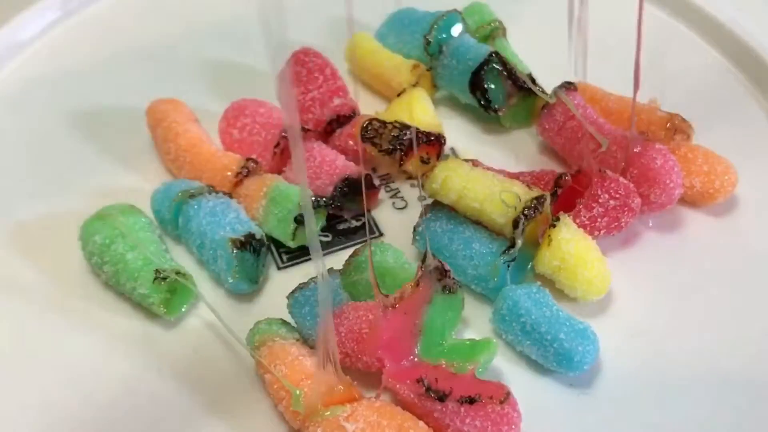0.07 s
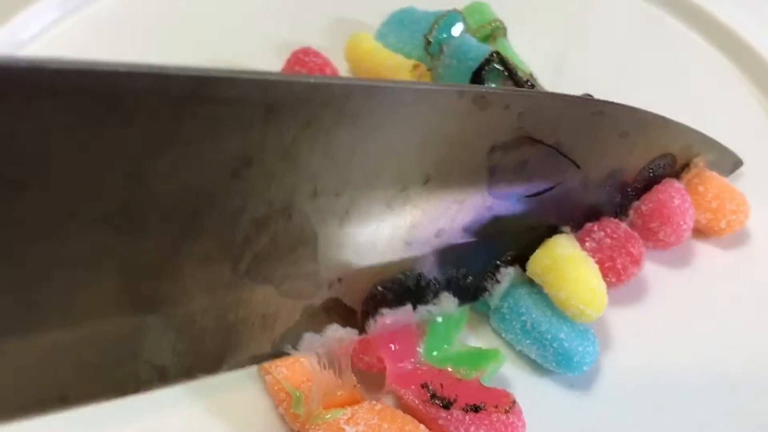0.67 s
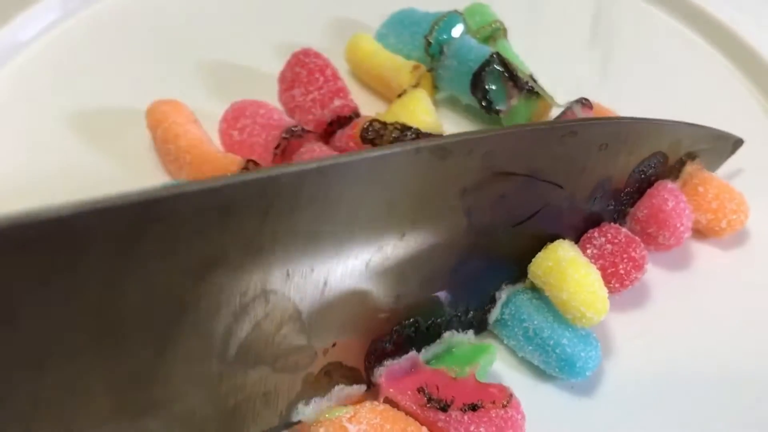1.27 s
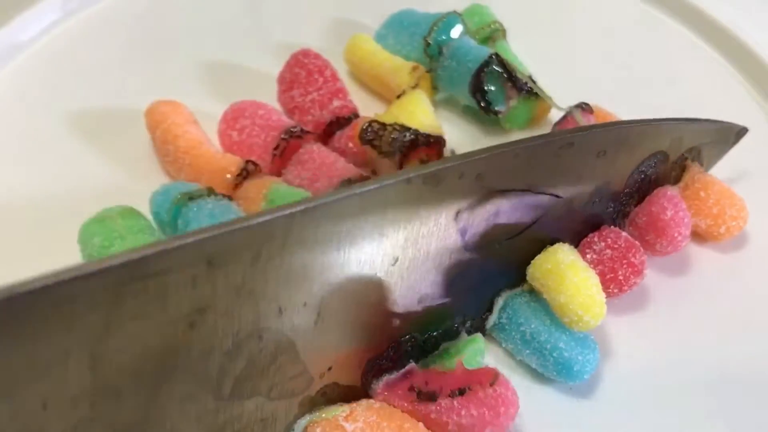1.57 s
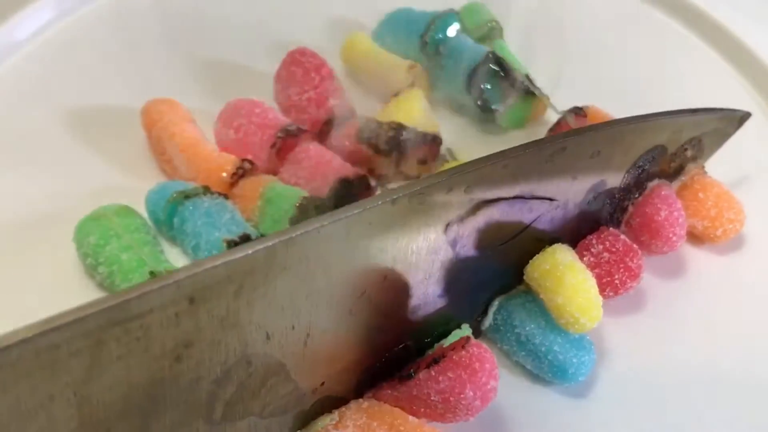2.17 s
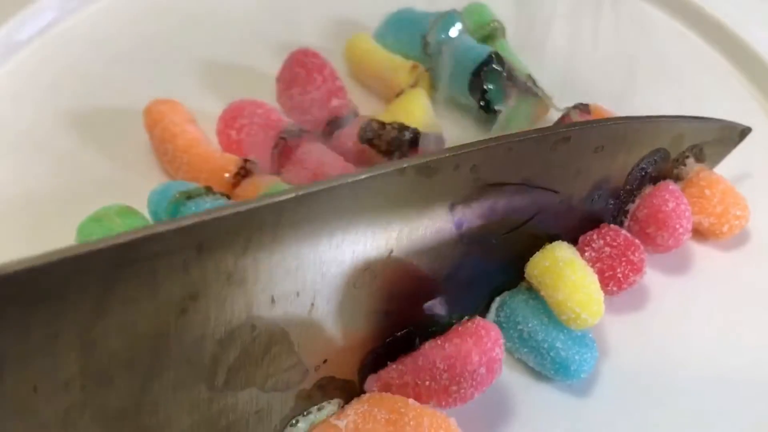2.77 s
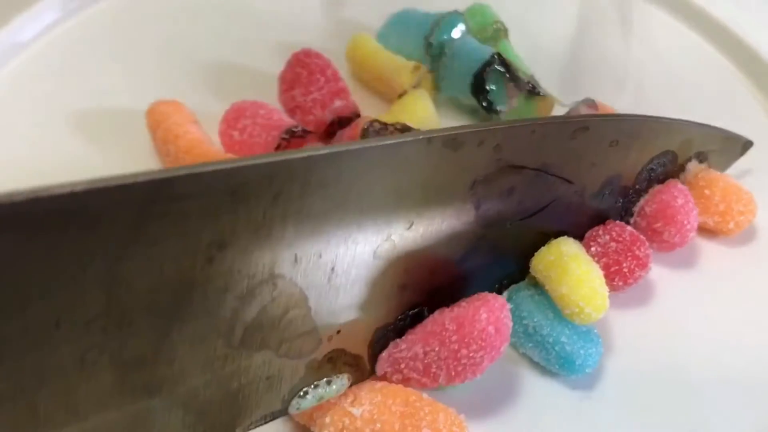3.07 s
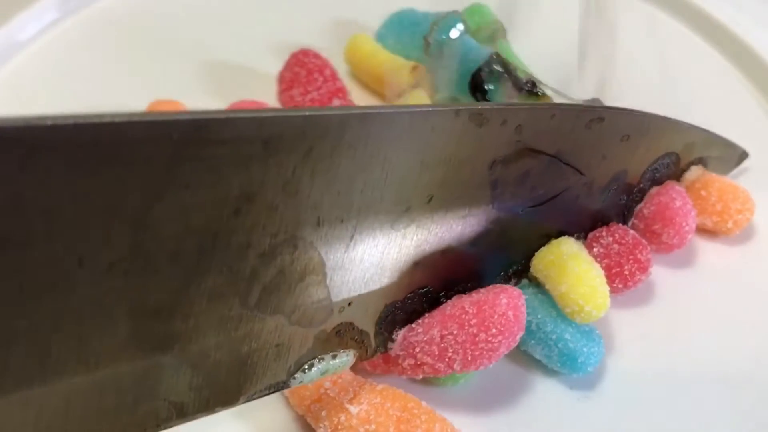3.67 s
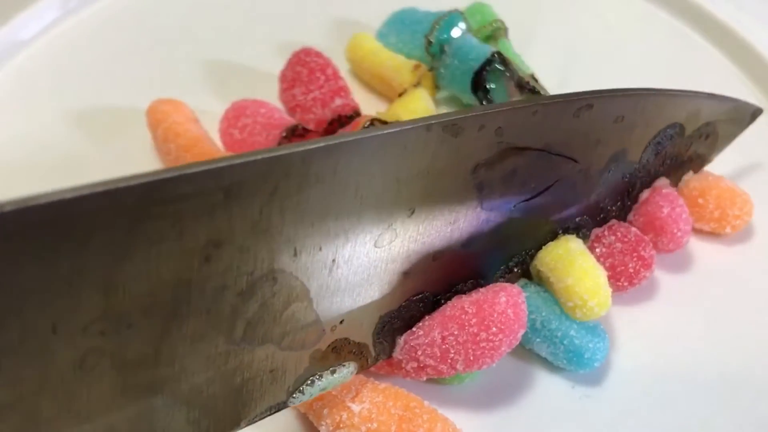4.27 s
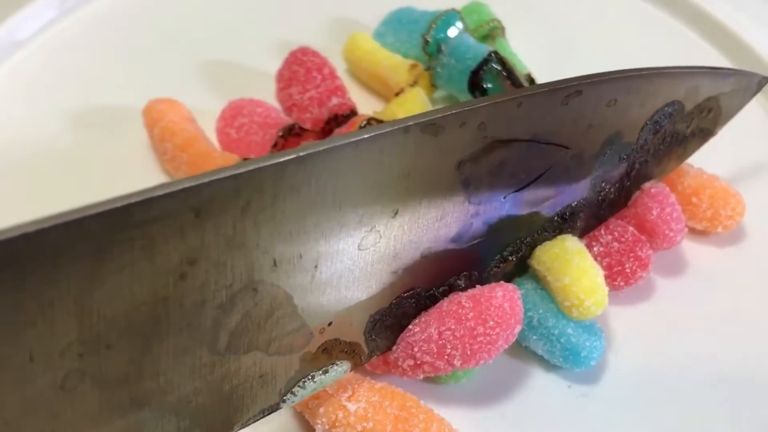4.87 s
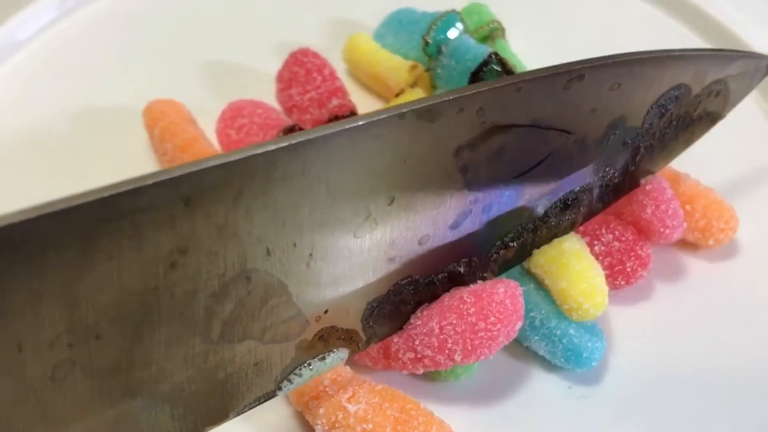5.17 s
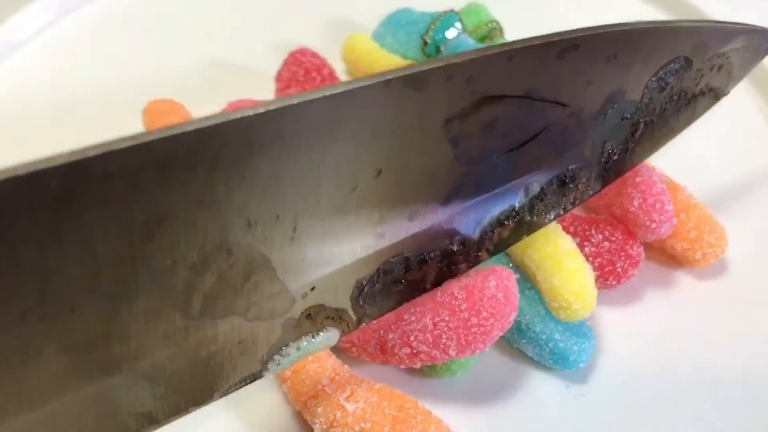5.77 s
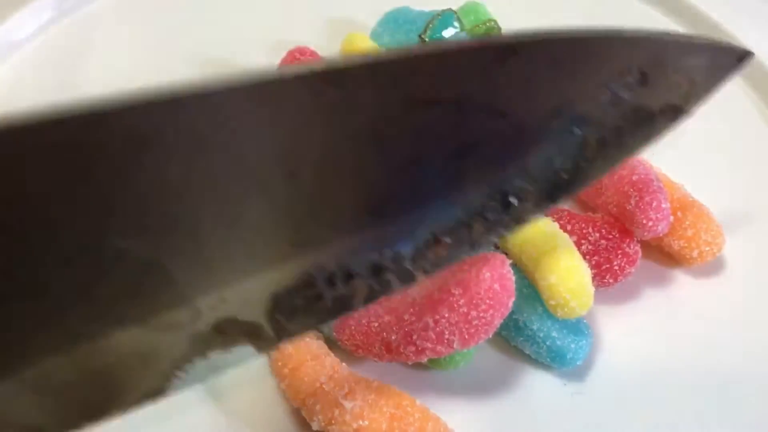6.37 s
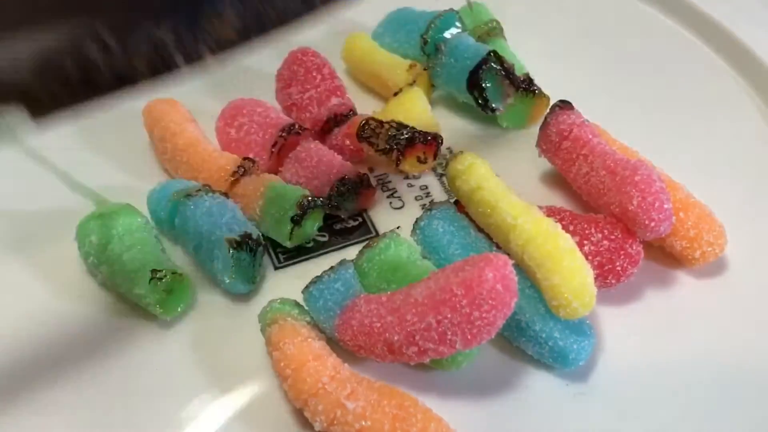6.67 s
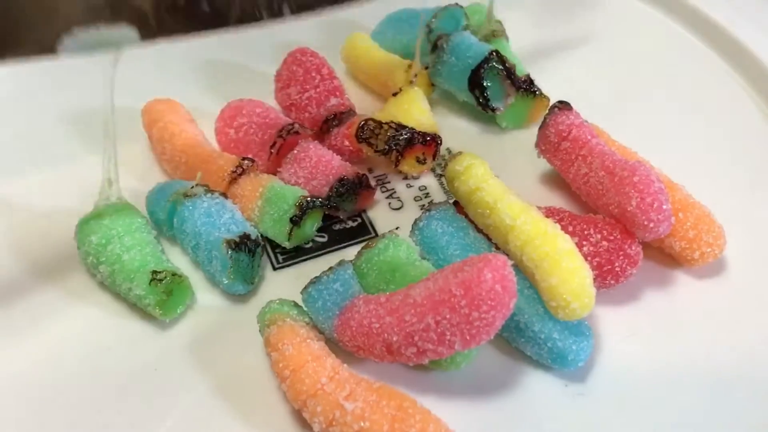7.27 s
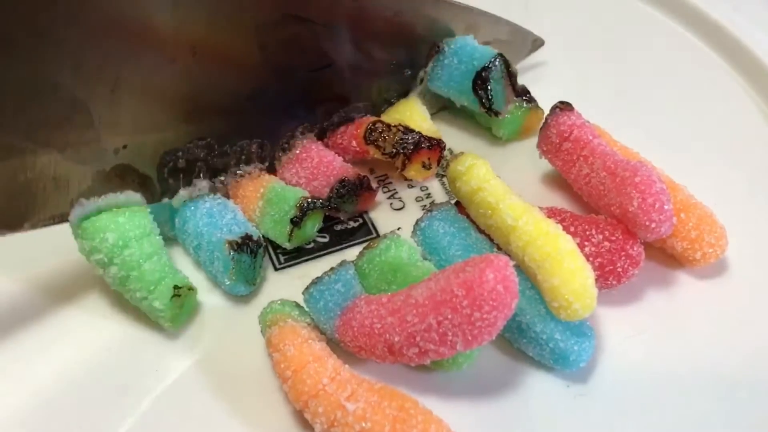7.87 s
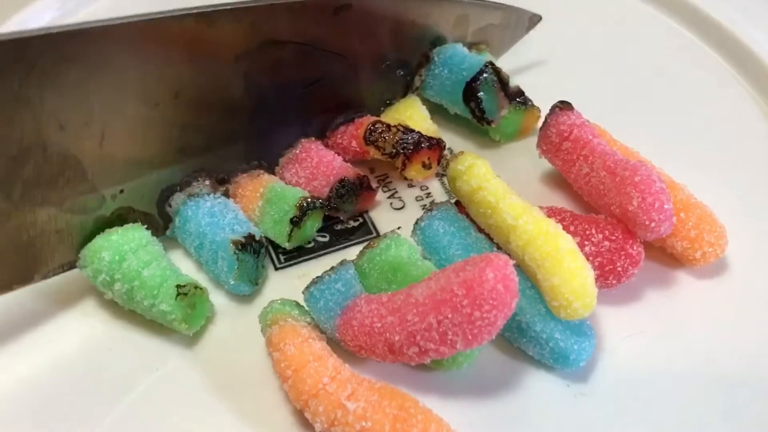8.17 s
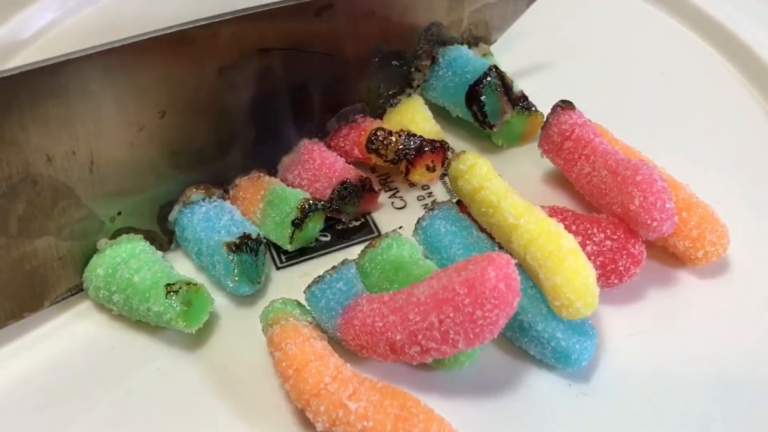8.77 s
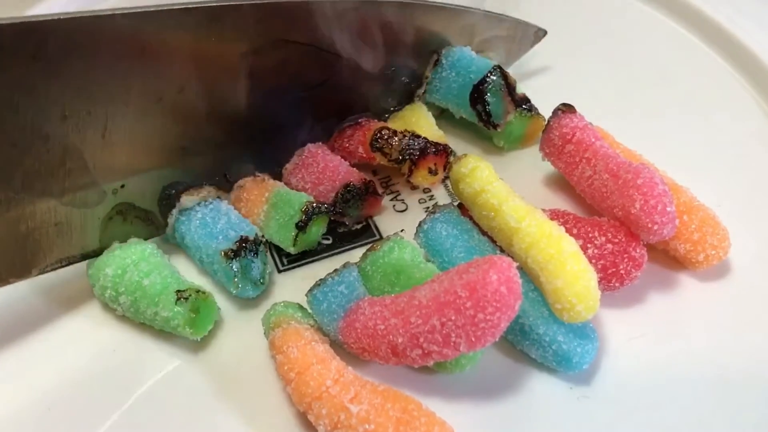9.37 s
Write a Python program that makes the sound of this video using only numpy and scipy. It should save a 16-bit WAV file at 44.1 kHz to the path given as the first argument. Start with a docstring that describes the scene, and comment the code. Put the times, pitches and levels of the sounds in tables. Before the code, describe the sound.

Close to the microphone in a quiet room, sugar boils under a hot knife with a dense, bright fizz. It comes in two stretches, each opened by quick, light clinks of steel on a plate, with a few tiny pops in the gap between. The second stretch grows stronger and carries a cluster of dull plate knocks near the end. Every clink and knock sounds reversed, rising briefly and cutting off, over a faint room hum.

```python
"""A quiet room: a hot knife is pressed twice into candy worms on a plate; time runs backwards.
Melting sugar boils under the blade as a dense fizz of tiny bursts, with a few lone pops.
The blade clinks and the plate knocks on the table: each ring swells up and stops dead at its contact.
Underneath lie a dull room rush, faint drones and a low rumble that swells now and then."""
import sys
import numpy as np
from scipy import signal
from scipy.fft import rfft, irfft
from scipy.io import wavfile
from scipy.ndimage import uniform_filter1d

SR = 44100
rng = np.random.default_rng(int(sys.argv[2]) if len(sys.argv) > 2 else 0)


def digitize_waveform(pressure):
    """Quantize a signal to 16-bit integers and store it at the path in sys.argv[1].

    Rows of a 2-D input are taken as channels; values are limited to [-1, 1].
    """
    field = np.atleast_2d(pressure).T
    bounded = np.clip(field, -1, 1)
    quanta = np.round(bounded * 32767).astype(np.int16)
    wavfile.write(sys.argv[1], SR, quanta)


N = 424683
TIME_S = np.arange(N) / SR
RING_TIME_S = np.arange(SR // 3) / SR
FREQS_HZ = np.maximum(np.fft.rfftfreq(N, 1 / SR), 1)


def from_db(db):
    """Decibels to gain."""
    return 10 ** (np.asarray(db) / 20)


def unit_rms(x):
    """Scale to rms 1."""
    return x / np.sqrt(np.mean(x ** 2) + 1e-20)


def spectrum_db(points):
    """Interpolate (Hz, dB) points over log frequency."""
    hz, db = np.transpose(points)
    return np.interp(np.log(FREQS_HZ), np.log(hz), db)


def coloured(x, db):
    """Shape the spectrum; rms 1."""
    return unit_rms(irfft(rfft(x) * from_db(db), N))


def butter(x, hz, kind, order=2):
    """Butterworth filter."""
    sos = signal.butter(order, np.clip(hz, 10, .45 * SR), kind, fs=SR, output="sos")
    return signal.sosfilt(sos, x)


def drift(rate_hz):
    """Slow random wander; rms 1."""
    grid_s = np.arange(0, N / SR + 1, 1 / 2000)
    hz = np.fft.rfftfreq(len(grid_s), grid_s[1])
    spectrum = rfft(rng.standard_normal(len(grid_s))) / (1 + (hz / rate_hz) ** 2)
    return np.interp(TIME_S, grid_s, unit_rms(irfft(spectrum, len(grid_s))))


def rumble(hz, edge_ratio=1.253):
    """Narrow band of low noise; rms 1."""
    return unit_rms(butter(rng.standard_normal(N), [hz / edge_ratio, hz * edge_ratio], "band"))


# Room rush. Each row: frequency in Hz, relative density in dB.
ROOM_SPECTRUM = [(18, -27), (33, -4.5), (50, 6.5), (65, -1), (90, -4.5), (130, -5.5), (200, -14.5),
                 (300, -16.5), (450, -22), (1000, -25), (2200, -32), (5000, -36), (15000, -64)]
# Low rumble swells; the loudest are reversed table rumble leading into the plate knocks.
# Each row: centre in seconds, top level in dB, half length in seconds, pitch in Hz.
RUMBLE_SWELLS = [(2.64, -65, 0.11, 142), (3.582, -59, 0.038, 128), (3.70, -55, 0.054, 139),
                 (4.248, -67.5, 0.18, 127), (5.05, -65.5, 0.093, 141), (5.62, -58.5, 0.35, 39.7),
                 (8.05, -67.5, 0.33, 121), (8.62, -59, 0.2, 83), (8.703, -45.5, 0.04, 131),
                 (8.784, -47, 0.058, 130)]
# Low tones. Each row: start in seconds, end in seconds, pitch in Hz, level in dB.
DRONE_TONES = [(0, 8.3, 50.1, -70.5), (1.2, 1.5, 117, -72), (1.57, 2.15, 116.6, -65),
               (6.27, 7.08, 304, -87)]

def background(room_db=-67, rumble_hz=128.6, rumble_db=-77, waver_db=2.0, fade_s=0.047):
    """Room rush, a steady rumble with occasional swells, and wavering drones."""
    out = from_db(room_db) * coloured(rng.standard_normal(N), spectrum_db(ROOM_SPECTRUM))
    out += from_db(rumble_db) * rumble(rumble_hz)
    for centre_s, db, half_s, hz in RUMBLE_SWELLS:
        out += from_db(db) * np.exp(-((TIME_S - centre_s) / half_s) ** 2) * rumble(hz)
    for start_s, end_s, hz, db in DRONE_TONES:
        gate = np.clip(np.minimum(TIME_S - start_s, end_s - TIME_S) / fade_s + .5, 0, 1)
        gain = gate * from_db(db + waver_db * drift(4.5))
        out += gain * np.sqrt(2) * np.sin(2 * np.pi * hz * TIME_S + 0.38 * drift(3.9))
    return out


def add_reversed(track, end_s, sound):
    """Mix a sound in backwards, ending at end_s."""
    end = min(round(end_s * SR), N)
    length = min(end, len(sound))
    track[end - length:end] += sound[:length][::-1]


def ring(modes, t60_scale=1, sharp_hz=SR, favoured_hz=SR, favour_db=7.0):
    """Modes build up and decay; a soft contact spares the high ones, the spot struck favours some."""
    hz, db, t60_s = np.transpose(modes)[:, :, None]
    db = db + favour_db * np.exp(-(np.log(hz / favoured_hz) / 0.1) ** 2)
    decay = from_db(db - 60 * RING_TIME_S / (t60_s * t60_scale))
    softening = np.sqrt(1 + (hz / sharp_hz) ** 4)
    rise = 1 - np.exp(-RING_TIME_S * hz)
    return np.sum(rise * decay / softening * np.sin(2 * np.pi * hz * RING_TIME_S), axis=0)


def burst(t60_s):
    """Decaying puff of noise."""
    return rng.standard_normal(len(RING_TIME_S)) * from_db(-60 * RING_TIME_S / t60_s)


def in_room(sound, wet_db, t60_s=0.29, first_echo_s=0.0023):
    """Direct sound plus a short diffuse tail."""
    tail = burst(t60_s) * (RING_TIME_S > first_echo_s)
    wet = signal.fftconvolve(sound, tail / np.linalg.norm(tail))[:len(sound)]
    return sound + from_db(wet_db) * wet


# Blade resonances. Each row: frequency in Hz, relative level in dB, base t60 in seconds.
BLADE_MODES = [(579, -12, 0.082), (796, -11.5, 0.041), (1586, -5, 0.029), (1710, -8.5, 0.05),
               (1805, -19, 0.045), (2270, -21, 0.058), (2289, -20, 0.18), (2350, -11, 0.069),
               (2700, -9, 0.043), (3210, -12, 0.049), (3580, -6.5, 0.045), (3770, -19, 0.075),
               (5190, -5, 0.055), (5070, -24, 0.031), (6920, -2.5, 0.048), (8900, -5.5, 0.078)]
# Blade on plate. Each row: contact in seconds, gain in dB, sharpness in Hz, t60 scale, favoured Hz.
BLADE_TOUCHES = [(.4250, -65.5, 5500, 1.4, 3600), (.4402, -58, 4000, 1.5, 3650),
                 (.4553, -51.5, 4500, 0.45, 5200), (.4642, -50.5, 2200, 0.99, 1570),
                 (0.484, -46.5, 6000, 0.54, 3700), (.5240, -49, 4000, 1.4, 2310),
                 (.5333, -37, 6000, 0.5, 3570), (.5562, -53, 2600, 0.75, 1580),
                 (5.8435, -66, 5000, 0.58, 7000), (7.2238, -57, 4200, .55, 2324),
                 (7.245, -52, 3000, 0.74, 2280), (7.2608, -42, 5080, 0.55, 2220),
                 (7.3594, -53.5, 3500, .45, 2510), (7.3834, -54, 3500, 0.65, 2480),
                 (7.4606, -51, 1500, 0.75, 600), (7.4808, -46.5, 2500, .7, 2220)]

def blade_clinks(crack_db=-8, crack_t60_s=0.011, crack_low_hz=1600):
    """Steel touches the plate: a crack and the blade's modes, reversed."""
    out = np.zeros(N)
    for contact_s, db, sharp_hz, t60_scale, favoured_hz in BLADE_TOUCHES:
        crack = butter(burst(crack_t60_s), crack_low_hz, "high")
        crack = from_db(crack_db) * butter(crack, 2.6 * sharp_hz, "low")
        blade = ring(BLADE_MODES, t60_scale, sharp_hz, favoured_hz)
        add_reversed(out, contact_s, from_db(db) * in_room(blade + crack, wet_db=-12.5))
    return out


# Lone pops. Each row: time in seconds, relative level in dB, low edge in Hz.
LONE_POPS = [(0.5360, -37, 2000), (0.6510, -37, 5500), (0.6526, -41, 5500), (5.511, -41, 7590),
             (5.689, -53, 7000), (5.765, -51, 5590), (5.812, -48, 5030), (5.838, -51, 6000),
             (6.026, -56, 6000), (6.468, -56, 6000), (6.648, -53, 4000), (6.840, -55, 6000),
             (7.268, -50, 3500)]
# Crackle of threads and stuck sugar. Each row: start and end in seconds, pops per second,
# relative level in dB, low edge in Hz.
CRACKLE_SPELLS = [(5.5, 5.695, 77, -49.5, 7540), (6.352, 7.152, 13, -58.5, 6000)]

def sugar_pops(t60_s=0.018, gain_db=-6, top_hz=11500):
    """Sugar blisters snap, singly or at random within spells: bright, short, reversed."""
    events = list(LONE_POPS)
    for start_s, end_s, per_s, db, low_hz in CRACKLE_SPELLS:
        count = round(per_s * (end_s - start_s))
        events += [(pop_s, db, low_hz) for pop_s in rng.uniform(start_s, end_s, count)]
    out = np.zeros(N)
    for pop_s, db, low_hz in events:
        snap = butter(burst(t60_s), low_hz, "high", order=4)
        snap = butter(snap, top_hz, "low", order=1)
        add_reversed(out, pop_s, from_db(db + gain_db) * in_room(snap, wet_db=-10))
    return out


THREADS_SNAP_S, BLADE_CLEAR_S = 5.69, 6.3  # trailing sugar breaks; boundary between the presses

def by_press(first, second):
    """Switch from the first press to the second while the blade is clear."""
    return np.where(TIME_S < BLADE_CLEAR_S, first, second)


def bubbles(per_s, size_db=3.5):
    """Bubbles of many sizes burst at random; equal power at any rate."""
    sizes = from_db(size_db * np.minimum(rng.exponential(1, N), 5)) * rng.choice([-1, 1], N)
    bursting = rng.random(N) < per_s / SR
    return unit_rms(sizes * bursting / np.sqrt(per_s))


def blade_echo(x, presses, dull_hz=7000, sway_share=0.019, sway_hz=0.5):
    """A duller copy off the blade combs the sound; its delay sways with the hand."""
    delay_ms, strength = (by_press(*column) for column in np.transpose(presses)[-2:])
    delay_ms = delay_ms * (1 + sway_share * drift(sway_hz))
    dull = irfft(rfft(x) / (1 + (FREQS_HZ / dull_hz) ** 4), N)
    return x + strength * np.interp(TIME_S - delay_ms / 1000, TIME_S, dull)


def drifting_colour(x, count=8, delay_range_s=(.0008, .005)):
    """Faint short delays fade in and out, making the fizz's colour shimmer."""
    lags = (rng.uniform(*delay_range_s, count) * SR).astype(int)
    return x + sum(.06 * drift(2) * np.roll(x, lag) for lag in lags)


# Sugar stuck to the lifted blade: base levels in dB of frying, sizzle, fizz.
STUCK_SUGAR_DB = [-90.5, -86, -80.5]
# Fade time scales of frying, sizzle, fizz. Big bubbles need firm contact: they come later, die sooner.
FADE_SCALES = [0.93, 0.99, 1.07]

def boil_levels(press, curve, release_s=0.26, fade_power=1.28, fry_per_coarse=1.347):
    """Frying, sizzle and fizz in dB: rising as the blade nears the candy, sinking as it leaves."""
    touch_s, leave_s, approach_s, fry_db, stuck_db = press[:5]
    times_s, *columns = np.transpose(curve)
    fizz_db, coarse_db = (np.interp(TIME_S, times_s, column) for column in columns)
    away = np.maximum(touch_s - TIME_S, 0) / approach_s + np.maximum(TIME_S - leave_s, 0) / release_s
    contact = np.exp(-(away / np.array(FADE_SCALES)[:, None]) ** fade_power)
    contact *= (TIME_S < THREADS_SNAP_S) | (TIME_S > BLADE_CLEAR_S)
    pressed_db = fizz_db + np.array([fry_db + fry_per_coarse * coarse_db, coarse_db, np.zeros(N)])
    lifted_db = stuck_db + np.array(STUCK_SUGAR_DB)[:, None]
    return contact * pressed_db + (1 - contact) * lifted_db


# Blade in candy. Each row: touch, leave and approach time in seconds, frying offset in dB,
# stuck sugar offset in dB, blade echo delay in ms, echo strength 0-1.
KNIFE_PRESSES = [(0.54, 5.305, 0.22, -2, -1.5, 1.08, 0.22), (7.569, 9.7, 0.19, -4.5, 0.5, 1.21, 0.02)]
# Boil strength per press. Each row: time in seconds, fizz in dB, coarseness (sizzle over fizz) in dB.
FIRST_BOIL_CURVE = [(0.6, -56.5, -6.5), (1.07, -55.5, -2.5), (1.27, -51.5, -3), (1.9, -58, -4.5),
                    (2.0, -57, -2), (2.27, -57, -0.5), (3.1, -52, -2.5), (3.83, -49, -5.5),
                    (4.22, -52, -5.5), (4.68, -51, -8), (4.91, -54.5, -7), (5.33, -50, -11.5)]
SECOND_BOIL_CURVE = [(7.6, -48, -5), (7.65, -48, -5), (7.76, -46, -4.5), (8.78, -48.5, -5.5),
                     (9.25, -43, -3.5), (9.46, -42, -6), (9.6, -40.5, -5.5)]
# Boil colour per press. Each row: frequency in Hz, relative density in dB.
FIRST_BOIL_SPECTRUM = [(250, -15.5), (500, -10.5), (780, -9.5), (1200, -9.5), (2200, -7.5), (3000, -6),
                       (4600, -6), (6500, 0), (9000, 1.5), (10600, 2.5), (12500, 6), (15300, 4.5)]
SECOND_BOIL_SPECTRUM = [(250, -16), (500, -19), (800, -12), (1300, -13.5), (2000, -11.5), (3000, -9),
                        (4400, -7), (5500, -6), (7000, -3), (9600, -0.5), (11000, 0), (15300, 2)]
# Peaks and dips of the blade-plate gap. Each row: centre in Hz, half width in Hz, gain in dB.
GAP_RESONANCES = [(730, 400, -2.5), (1650, 150, 0.5), (2036, 210, -3.5), (2950, 320, 3), (3540, 140, -3),
                  (3850, 93, 2), (4440, 330, 1), (4906, 290, -4.5), (6680, 110, 0.5), (7570, 250, -1.5),
                  (8530, 100, 2.5), (9500, 600, 1.5), (10520, 350, -2), (11560, 550, 1)]
# Edges of the frying, sizzle and fizz bands in Hz.
BAND_EDGES_HZ = [100, 4800, 8400, 15300]

def sugar_boil(bursts_per_s=6000, full_boil_db=-53, steam_db=1.0, sputter_db=0.2, flutter_db=0.73,
               surge_db=0.84, trims_db=(-0.09, 0.0, -0.34), overlap=0.24):
    """Bursts and steam, coloured by the gap under the blade; big bubbles fry low, small ones fizz high."""
    levels_db = by_press(boil_levels(KNIFE_PRESSES[0], FIRST_BOIL_CURVE),
                         boil_levels(KNIFE_PRESSES[1], SECOND_BOIL_CURVE))
    per_s = bursts_per_s * from_db(.5 * (levels_db[-1] - full_boil_db))  # a weak boil thins to crackles
    source = bubbles(per_s) + from_db(steam_db) * rng.standard_normal(N)
    source *= from_db(sputter_db * drift(130) + flutter_db * drift(15))
    source = drifting_colour(blade_echo(source, KNIFE_PRESSES))
    gap_db = sum(db * np.exp(-((FREQS_HZ - hz) / half_hz) ** 2) for hz, half_hz, db in GAP_RESONANCES)
    first = coloured(source, spectrum_db(FIRST_BOIL_SPECTRUM) + gap_db)
    second = coloured(source, spectrum_db(SECOND_BOIL_SPECTRUM) + gap_db)
    spectrum = rfft(by_press(first, second))
    # the three bands blend; each is levelled over 0.2 s, then surges on its own
    above = [1] + [.5 + .5 * np.tanh(np.log(FREQS_HZ / hz) / overlap) for hz in BAND_EDGES_HZ[1:-1]] + [0]
    out = np.zeros(N)
    for k, db in enumerate(levels_db):
        core = irfft(spectrum * (FREQS_HZ > BAND_EDGES_HZ[k]) * (FREQS_HZ <= BAND_EDGES_HZ[k + 1]), N)
        running_rms = np.sqrt(uniform_filter1d(core ** 2, SR // 5))
        band = irfft(spectrum * (above[k] - above[k + 1]), N)
        out += from_db(db + trims_db[k] + surge_db * drift(5)) * band / running_rms
    return out


# Plate and table resonances. Each row: frequency in Hz, relative level in dB, base t60 in seconds.
PLATE_MODES = [(260, -18, 0.065), (459, -22, 0.16), (573.5, -4, 0.054), (617, -1.5, 0.036),
               (762, -7.5, 0.03), (862, -17, 0.027), (1143, -18.5, 0.03), (1229, -10, 0.029),
               (1540, -12, 0.038), (1687, 0, 0.021), (1805, -5.5, 0.04), (2400, -4.5, 0.029),
               (2755, -8.5, 0.04), (3590, -2.5, 0.03), (4280, -0.5, 0.018)]
TABLE_MODES = [(72, -20, 0.19), (127, 5.5, 0.043), (144, -28, 0.15), (135, -28, 0.28), (169, -35.5, 0.068)]
# Plate on table. Each row: contact in seconds, gain in dB, sharpness in Hz, t60 scale, favoured Hz,
# favour in dB, relative table thump in dB.
PLATE_CONTACTS = [(3.71, -54, 700, 1, 500, 3, -39), (3.7240, -51, 2000, 1.3, 795, 4, -42),
                  (3.7328, -38.5, 4200, 0.88, 800, 13, -63), (3.805, -54, 3200, 2.1, 1610, 9, -52),
                  (7.9489, -54, 2800, 0.54, 2400, 4, -73), (7.9597, -51.5, 2800, 1.7, 2400, 12, -53),
                  (7.981, -56, 2600, 1.7, 2400, 10, -66), (8.229, -56, 1103, 1.3, 898, 16, -59),
                  (8.7030, -35, 440, 1.5, 255, 15, -50), (8.7197, -26, 1590, 1.05, 1830, 0, -41),
                  (8.8339, -19, 670, 1.15, 1135, 14.5, -21.5), (8.8942, -49.5, 3530, 1.2, 1840, 14, -72),
                  (8.9376, -44.5, 2600, 0.58, 850, 21, -45)]

def plate_knocks(crack_db=-12, thump_db=5, rattle_db=-13, rattle_top_hz=520):
    """The plate rocks under the knife: it rings, its foot rattles, it thumps the table; all reversed."""
    out = np.zeros(N)
    for contact_s, db, sharp_hz, t60_scale, favoured_hz, favour_db, table_db in PLATE_CONTACTS:
        plate = ring(PLATE_MODES, t60_scale, sharp_hz, favoured_hz, favour_db)
        crack = from_db(crack_db) * butter(burst(t60_s=0.0076), sharp_hz, "low")
        rattle = from_db(rattle_db) * butter(burst(t60_s=0.25), [rattle_top_hz / 3, rattle_top_hz], "band")
        thump = from_db(table_db + thump_db) * ring(TABLE_MODES)
        knock = from_db(db) * (plate + crack + rattle) + thump
        add_reversed(out, contact_s, in_room(knock, wet_db=-14))
    return out


def scene():
    """All sources at one microphone, alike in both channels."""
    mono = sugar_boil() + blade_clinks() + plate_knocks() + background() + sugar_pops()
    return np.tile(mono, (2, 1))


def record(dry, low_cut_hz=33, high_cut_hz=15330):
    """The microphone drops the deepest bass; the top is cut steeply."""
    high_pass = 1 / np.sqrt(1 + (low_cut_hz / FREQS_HZ) ** 10)
    low_pass = 1 / np.sqrt(1 + (FREQS_HZ / high_cut_hz) ** 600)
    return irfft(rfft(dry) * high_pass * low_pass, N)


dry = scene()
out = record(dry)
digitize_waveform(out)
```